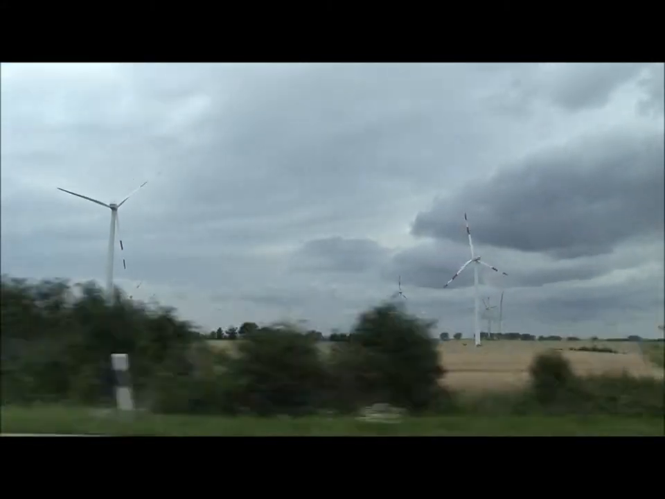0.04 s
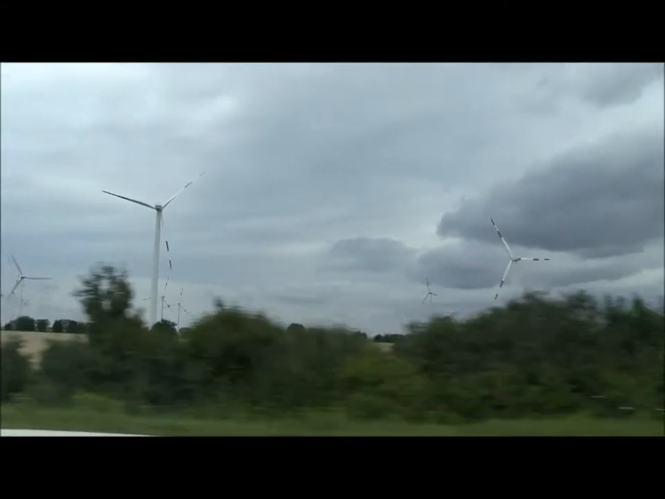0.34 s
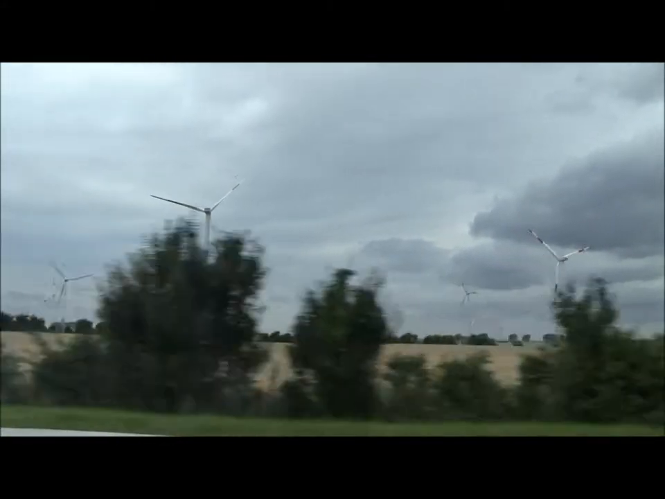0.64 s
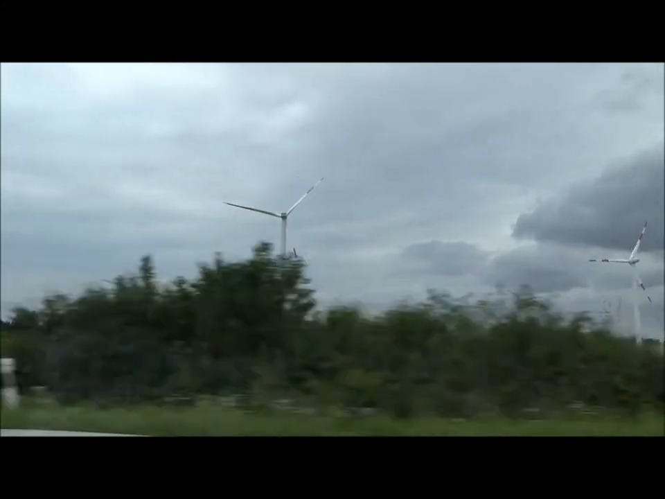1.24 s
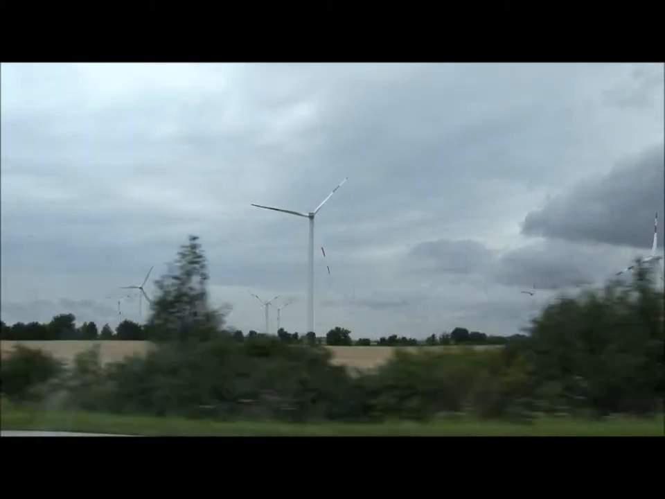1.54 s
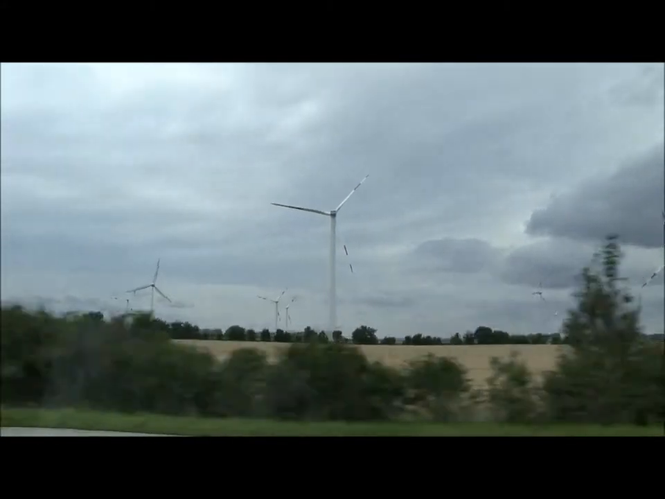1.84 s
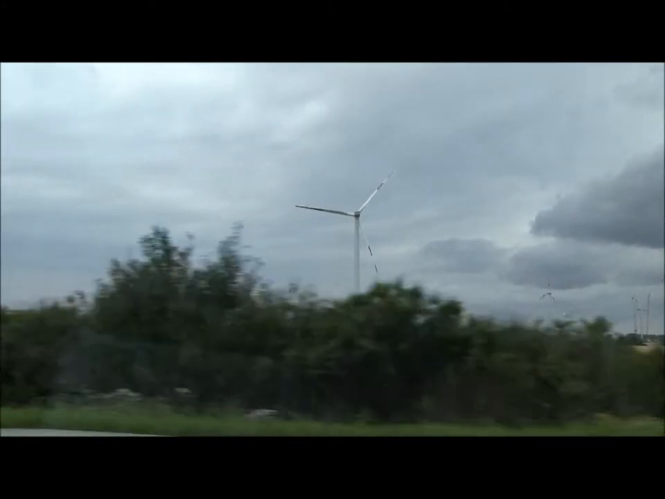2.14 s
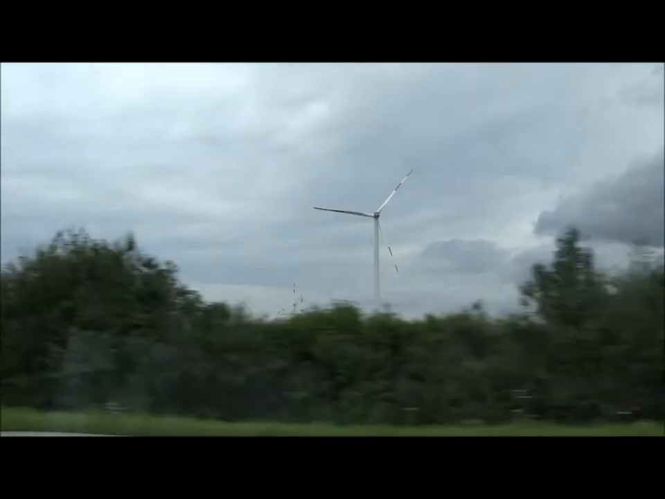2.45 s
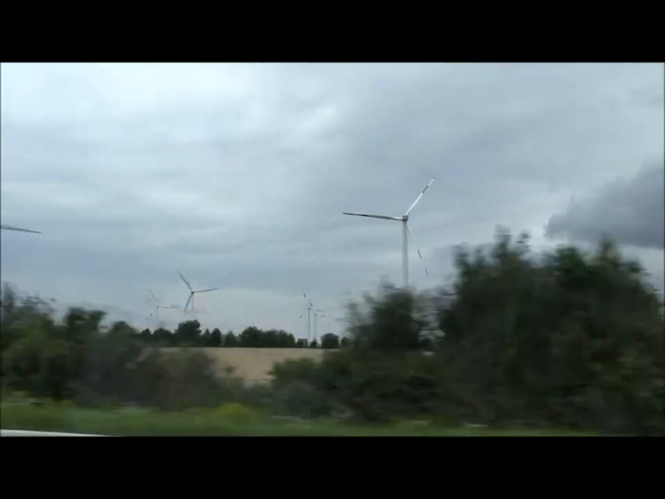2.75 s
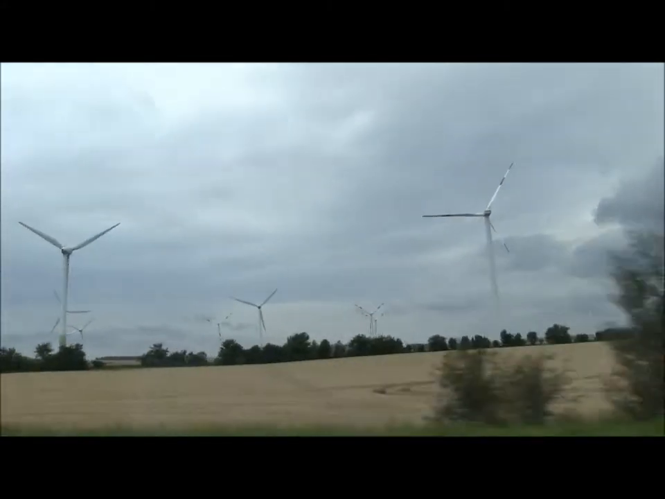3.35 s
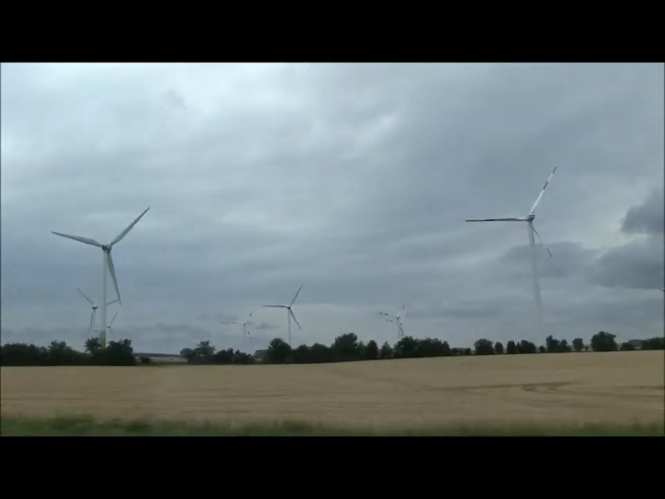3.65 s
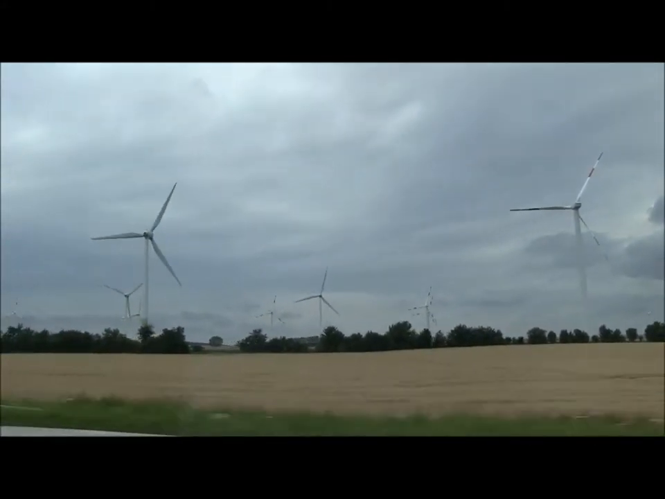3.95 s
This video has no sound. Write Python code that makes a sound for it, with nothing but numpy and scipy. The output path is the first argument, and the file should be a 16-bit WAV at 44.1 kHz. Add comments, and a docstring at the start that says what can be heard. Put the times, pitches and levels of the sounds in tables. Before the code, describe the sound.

Heard from inside a car on a country road, tyres rumble and hum continuously under a softer rush of wind. Late on, a single brief plastic knock cracks near the microphone, and the driving noise carries on.

```python
"""Car cabin on a country road

Tyre rumble fills the cabin, the wheels hum on multiples of their rotation rate, and wind hisses
past the side window with a thin seal whistle and faint high rustles. One sharp knock on hard
plastic sounds close to the microphone, whose gain control ducks the road noise for a moment."""
import sys
import numpy as np
from scipy import signal
from scipy.fft import rfft, irfft
from scipy.io import wavfile
from scipy.ndimage import uniform_filter1d, minimum_filter1d

SR = 44100
rng = np.random.default_rng(int(sys.argv[2]) if len(sys.argv) > 2 else 0)


def materialize(psi):
    """Save the field psi as 16-bit PCM at rate SR to the path in sys.argv[1].

    A 1-D psi becomes a single channel; in a 2-D psi each row is a channel.
    """
    bounded = np.clip(np.atleast_2d(psi).T, -1, 1)
    quanta = np.round(bounded * 32767).astype(np.int16)
    wavfile.write(sys.argv[1], SR, quanta)


N = 176400

# likeness of the two microphone ports (frequency [Hz], correlation [clipped to 1])
PORT_CORRELATION = [(40, 0.7), (150, 0.94), (270, 0.9), (400, 0.43), (650, .62), (900, 0.8), (1250, 0.11),
                    (1700, 0.38), (2200, 0.71), (3500, 0.2), (5000, 0.37), (7500, 0.76), (12000, 1.4)]
# port balance (frequency [Hz], left minus right [dB])
PORT_BALANCE = [(40, 7), (80, -2.5), (150, 2.5), (220, -6), (350, -1.5), (490, 1.5), (700, 1), (850, 2),
                (1120, -1.5), (1400, 2.5), (1800, -1.5), (3000, 1.5), (5000, -.5)]
# cabin road noise (frequency [Hz], relative density [dB])
ROAD_SPECTRUM = [(10, -48.5), (22, -23), (32, -13), (56, -12), (82, -6.5), (113, -1), (160, -1),
                 (250, -1.5), (335, -4), (430, -6), (510, -9.5), (610, -13), (755, -17), (880, -12),
                 (1000, -19.5), (1120, -21.5), (1500, -31), (2000, -66.5), (3500, -110)]
# road surface (time [s], roughness [relative])
ROUGHNESS = [(0.0, -8), (0.7, -13), (0.95, -11.5), (1.89, -16), (2.2, -8), (2.27, -10.5), (2.37, -5),
             (2.39, -17), (2.52, -7.5), (2.75, -15.5), (2.92, -12.5), (2.99, -8), (3.18, -16.5),
             (3.24, -15.5), (3.45, -13.5), (3.58, -17), (3.76, -11.5), (3.86, -17), (4, -9.5)]
# deep bass swell (time [s], gain [dB])
BASS_SWELL = [(0, 4.5), (.6, 1.5), (1.2, 3), (1.7, 0), (2.1, 1), (2.35, 1.5), (2.9, 1), (3.3, 0), (3.6, -3),
              (4, -1)]
# cabin and tread resonances (frequency [Hz], half-width [Hz], level [dB], left minus right [dB])
ROAD_MODES = [(39, 4.5, -33.5, 4), (120.1, 11, -22.5, -0.5), (172.3, 9.2, -23.5, -1), (836.6, 16, -35, 5),
              (977, 14, -39, 0.5)]
# tyre hum (order [per turn], level [dB], left minus right [dB])
TYRE_ORDERS = [(8, -28, -1.5), (13, -27, -7), (16, -33.5, 0), (20, -29, 3), (24, -26.5, 2), (27, -32.5, -2),
               (36, -32, 1), (38, -28, 1), (40, -28.5, 6)]
# wind at the window (frequency [Hz], relative density [dB])
WIND_SPECTRUM = [(500, -28.5), (1000, -3), (1500, 3.5), (1950, -3), (2300, -2.5), (2800, -6), (3700, -10.5),
                 (5200, -15.5), (6000, -22), (7300, -26.5), (9500, -34.5), (12000, -40.5), (14500, -42.5)]
# gusts (time [s], gain [dB])
GUST_GAIN = [(0, 2.5), (.3, 1.5), (.45, 0.5), (.7, 0.5), (1.15, 0.8), (1.6, -1.2), (2.2, 1.5), (2.75, -2.3),
             (3.05, 0.5), (3.25, -1.5), (3.6, -2.5), (4, 0)]
# seal whistle (time [s], level [dB])
WHISTLE_LEVEL = [(0, -69), (.27, -60.5), (.55, -76), (1.2, -64), (1.7, -78), (3, -74), (4, -65)]
# high rustles (peak time [s], length [s], level [dB], centre [Hz], half-width [Hz])
RUSTLE_SWELLS = [(.49, 0.06, -62, 12300, 1300), (.715, 0.04, -59.5, 12500, 2200),
                 (1.097, .5, -68, 12500, 2200), (3.345, .08, -59, 8000, 4000)]
# knock contacts (time [s], gain [dB], left minus right [dB])
CONTACTS = [(3.2626, -3.5, -8), (3.2643, -9, 14)]
# knocked plastic (frequency [Hz], relative level [dB], T60 [s])
PLASTIC_MODES = [(843, -2.5, 0.042), (1210, -11, 0.023), (1690, -9, 0.018), (2350, -2, 0.018),
                 (3070, -4.5, 0.018), (4970, -15, 0.018), (6850, -23, .018)]
# contact crack (frequency [Hz], relative density [dB])
CRACK_SPECTRUM = [(300, -30), (800, 1), (1500, 6.5), (2300, 5), (2650, -10), (3100, 4.5), (3800, -13),
                  (4900, -5), (5800, -14), (8500, -17), (11000, -32), (13500, -27), (15500, -38)]

TIME_S = np.arange(N) / SR
BINS_HZ = np.fft.rfftfreq(N, 1 / SR)


def amp(db):
    return 10 ** (np.asarray(db) / 20)


def unit_rms(x):
    return x / np.sqrt(np.mean(x ** 2) + 1e-20)


def over_hz(points):
    """Table at every bin, log-frequency interpolation."""
    hz, value = np.transpose(points)
    return np.interp(np.log(BINS_HZ + 1), np.log(hz + 1), value)


def over_time(points):
    return np.interp(TIME_S, *np.transpose(points))


def pan(side_db):
    return amp(np.array([[0.5], [-0.5]]) * side_db)


def decay(t, t60_s):
    return np.exp(-np.log(1000) * t / t60_s)


def drift(rate_hz):
    """Smooth random motion, rms 1."""
    spectrum = rfft(rng.standard_normal(N)) * np.exp(-(BINS_HZ / rate_hz) ** 2) * (BINS_HZ > 0)
    return unit_rms(irfft(spectrum, N))


def stereo_noise(spectrum):
    """Coloured noise at the two ports, rms 1."""
    a, b = rfft(rng.standard_normal((2, N)))
    correlation = np.clip(over_hz(PORT_CORRELATION), -1, 1)
    mid, side = a * np.sqrt(1 + correlation), b * np.sqrt(1 - correlation)
    ports = np.array([mid + side, mid - side]) * pan(over_hz(PORT_BALANCE))
    return unit_rms(irfft(ports * amp(over_hz(spectrum)), N))


def resonance(centre_hz, half_width_hz):
    """Noise-driven resonance, rms 1."""
    response = 1 / (1 + ((BINS_HZ - centre_hz) / half_width_hz) ** 2)
    return unit_rms(irfft(rfft(rng.standard_normal(N)) * response, N))


def road(turns, noise_db=-11, crossover_hz=114, db_per_roughness=0.39):
    """Rumble, resonances and tyre hum follow the surface; the deep bass swells on its own."""
    booms = sum(amp(db) * pan(side_db) * resonance(hz, half_width_hz)
                for hz, half_width_hz, db, side_db in ROAD_MODES)
    rumble = amp(noise_db) * stereo_noise(ROAD_SPECTRUM) + booms + tyre_hum(turns)
    bass = signal.sosfiltfilt(signal.butter(3, crossover_hz, fs=SR, output="sos"), rumble)
    roughness = over_time(ROUGHNESS)
    surface_db = db_per_roughness * (roughness - roughness.mean())
    return bass * amp(over_time(BASS_SWELL)) + (rumble - bass) * amp(surface_db)


def tyre_hum(turns, waver=0.21):
    """Multiples of the wheel rate, unsteady in strength and phase."""
    out = np.zeros((2, N))
    for order, db, side_db in TYRE_ORDERS:
        sway = 1 + waver * (drift(rate_hz=3.4) + 1j * drift(rate_hz=7))
        tone = np.exp(2j * np.pi * (order * turns + rng.random()))
        out += amp(db) * pan(side_db) * unit_rms((sway * tone).real)
    return out


def wind(turns, hiss_db=-32, flutter_db=0.61, pulse_db=0.23):
    """Air past the window: gusts, flutter and a slight pulse per wheel turn."""
    level_db = hiss_db + over_time(GUST_GAIN) + flutter_db * drift(rate_hz=37)
    level_db -= pulse_db * np.sin(2 * np.pi * turns)
    return amp(level_db) * stereo_noise(WIND_SPECTRUM)


def seal_whistle():
    """Air at the window seal rings in a narrow band."""
    return amp(over_time(WHISTLE_LEVEL)) * resonance(centre_hz=7460, half_width_hz=40)


def rustles():
    """Soft swells of very high hiss."""
    out = np.zeros(N)
    for peak_s, length_s, db, hz, half_width_hz in RUSTLE_SWELLS:
        swell = np.exp(-(2 * (TIME_S - peak_s) / length_s) ** 2)
        out += amp(db) * swell * resonance(hz, half_width_hz)
    return out


def knock(crack_db=-4.5, echo_db=-19, rise_s=0.00044):
    """Two quick contacts: snap as surfaces meet, crack with cabin echo, damped plastic ring."""
    snap_db, snap_delay_s, snap_width_s = -5, 0.00046, 0.00004
    out, t = np.zeros((2, N)), TIME_S[:SR // 10]
    snap = amp(snap_db) * np.exp(-abs(t - snap_delay_s) / snap_width_s)
    attack = np.minimum(t / rise_s, 1)
    crack_decay = decay(t, t60_s=0.017) + amp(echo_db) * decay(t, t60_s=0.08)
    for start_s, db, side_db in CONTACTS:
        ring = sum(amp(mode_db) * decay(t, t60_s) * np.sin(2 * np.pi * (hz * t + rng.random()))
                   for hz, mode_db, t60_s in PLASTIC_MODES)
        crack = amp(crack_db) * stereo_noise(CRACK_SPECTRUM)[:, :len(t)] * crack_decay
        start = round(start_s * SR)
        out[:, start:start + len(t)] += amp(db) * pan(side_db) * (snap + (ring + crack) * attack)
    return out


def gain_control(x, sense_hz=1450, threshold_db=-26, slope=0.3, hold_s=0.03, recovery_db_per_s=100):
    """Treble above threshold ducks the whole signal; the gain holds, then recovers."""
    treble = signal.sosfilt(signal.butter(2, sense_hz, "high", fs=SR, output="sos"), x)
    power = signal.lfilter([0.01], [1, -0.99], (treble ** 2).mean(0))  # 2.3 ms average
    cut_db = slope * np.maximum(10 * np.log10(power + 1e-12) - threshold_db, 0)
    hold = int(hold_s * SR)
    held_db = -minimum_filter1d(-cut_db, hold, origin=(hold - 1) // 2)  # trailing maximum
    recovery_db = TIME_S * recovery_db_per_s
    duck_db = np.maximum.accumulate(held_db + recovery_db) - recovery_db
    return x / amp(duck_db)


def limiter(x, smooth_s=0.0012):
    """Smoothed gain keeps peaks within full scale."""
    span = int(smooth_s * SR)
    gain = np.minimum(1 / (abs(x).max(0) + 1e-9), 1)
    held = minimum_filter1d(gain, 2 * span)
    return x * uniform_filter1d(uniform_filter1d(held, span), span)


def scene():
    """Road and wind share one wheel rotation; rustles and knock on top."""
    wheel_hz = 12.6 * (1 + 0.0021 * drift(rate_hz=1))
    turns = np.cumsum(wheel_hz) / SR
    return road(turns) + wind(turns) + seal_whistle() + rustles() + knock()


def record(dry):
    """Gain control, peak limiter, 15.2 kHz low-pass."""
    ducked = limiter(gain_control(dry))
    lowpass = signal.firwin(255, 15200, window=("kaiser", 9), fs=SR)
    return signal.oaconvolve(ducked, lowpass[None], "same")


dry = scene()
out = record(dry)
materialize(out)
```